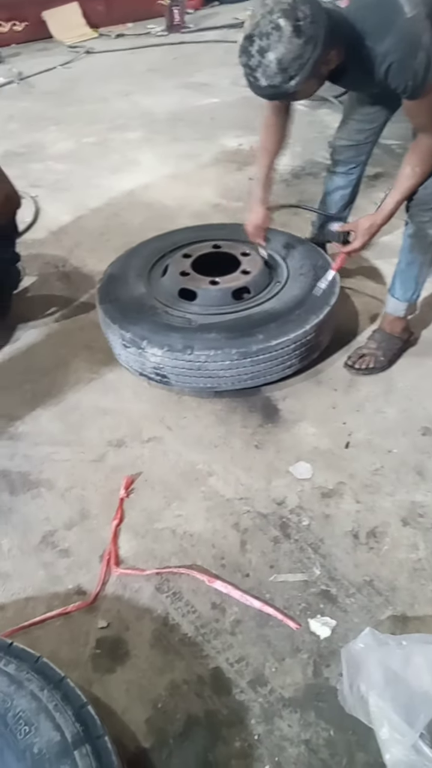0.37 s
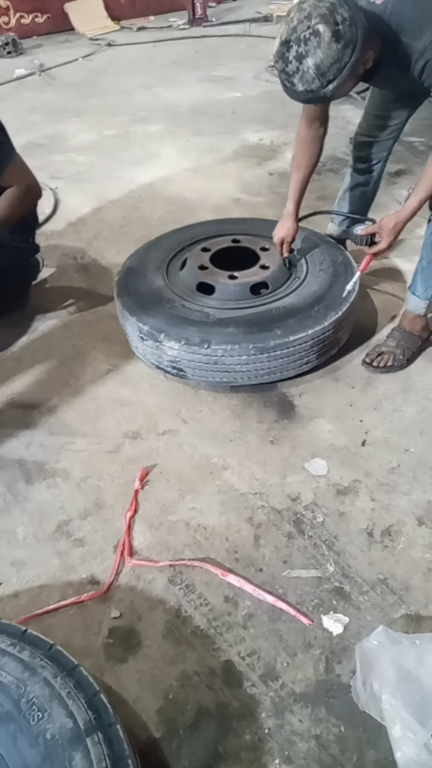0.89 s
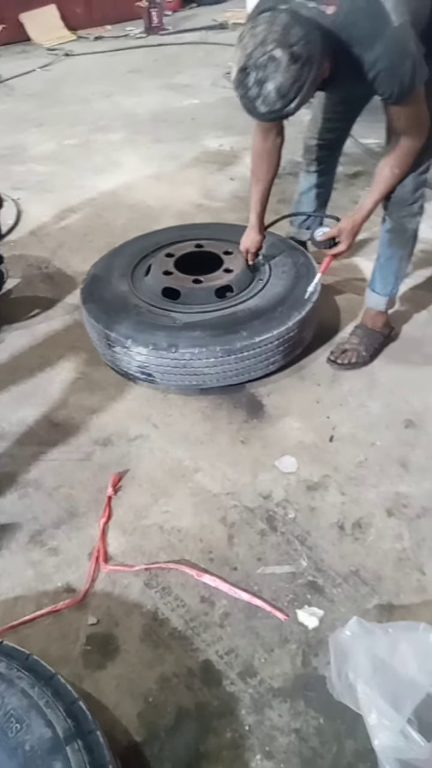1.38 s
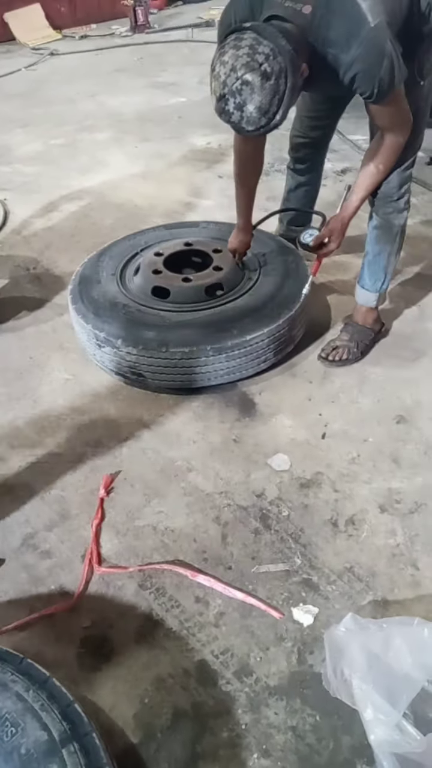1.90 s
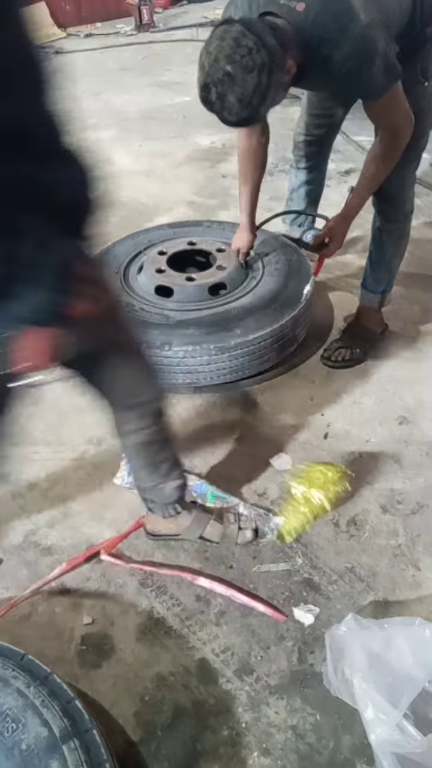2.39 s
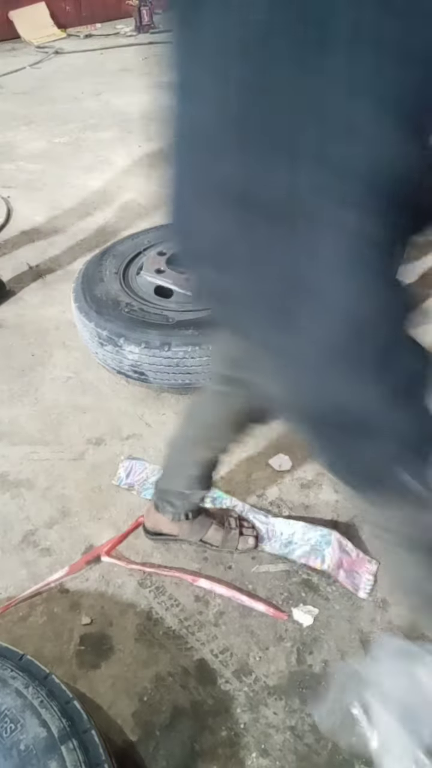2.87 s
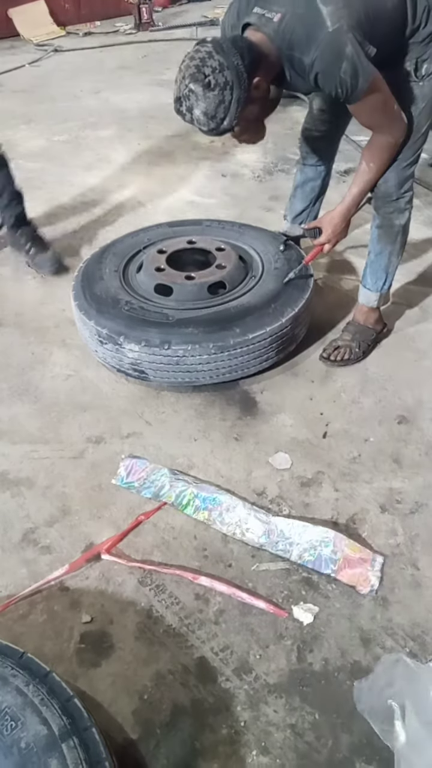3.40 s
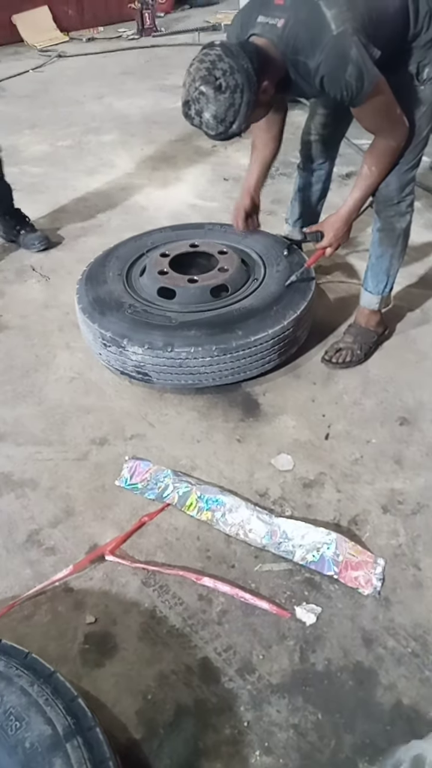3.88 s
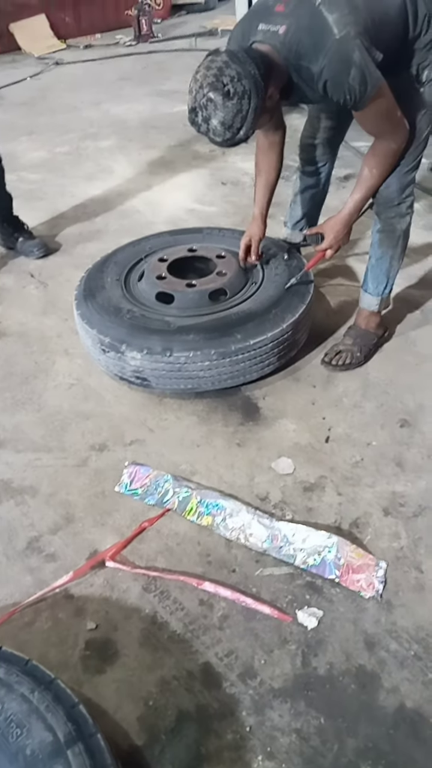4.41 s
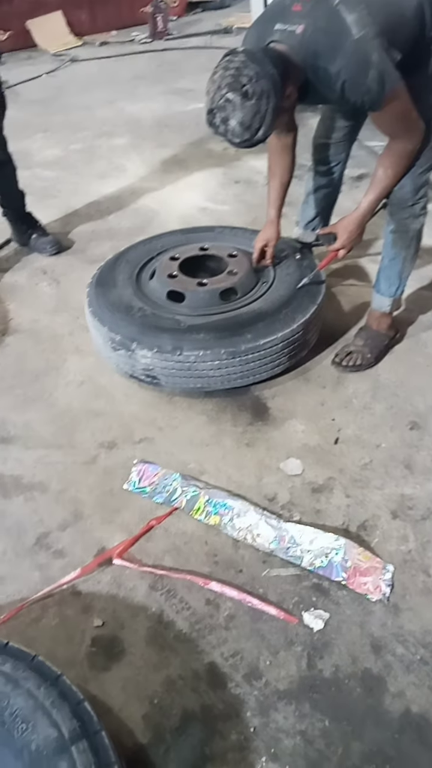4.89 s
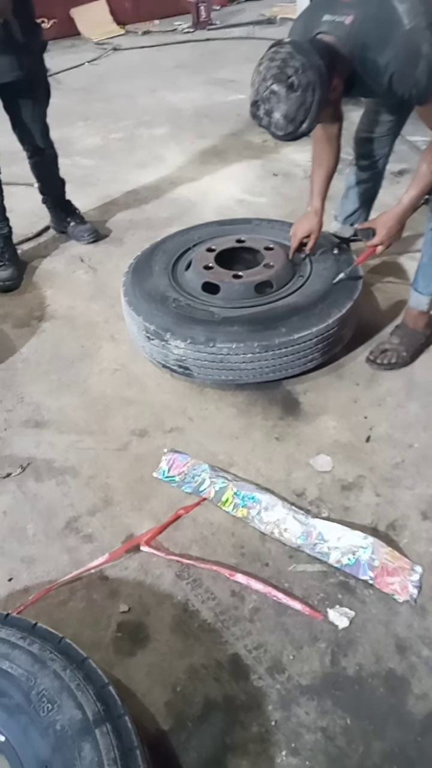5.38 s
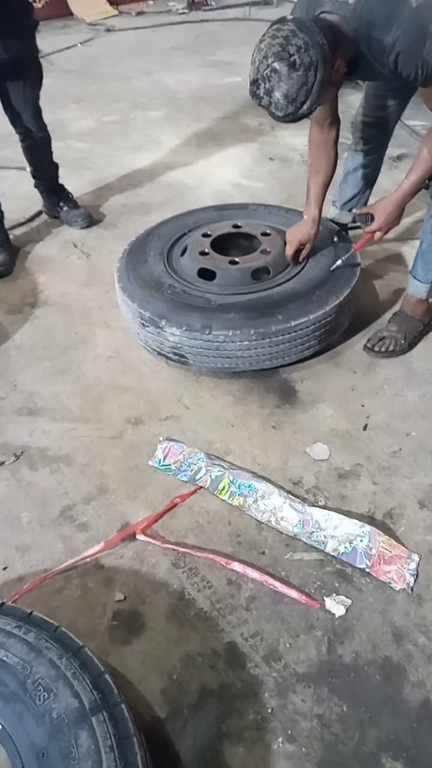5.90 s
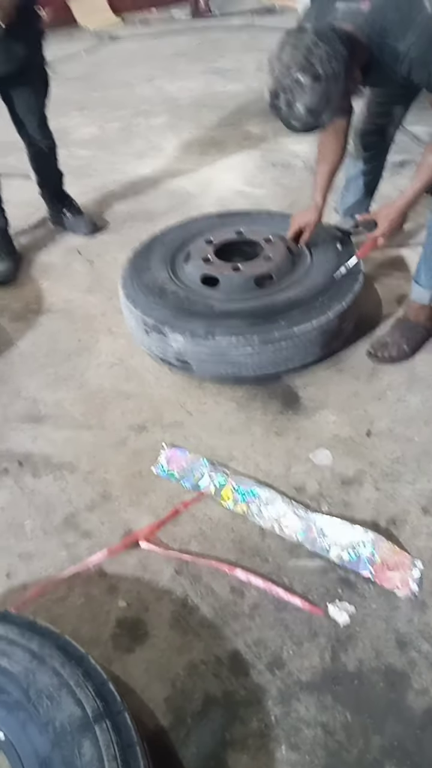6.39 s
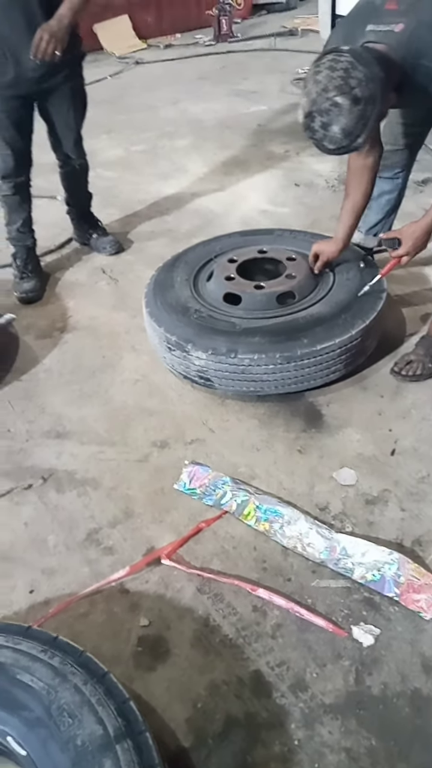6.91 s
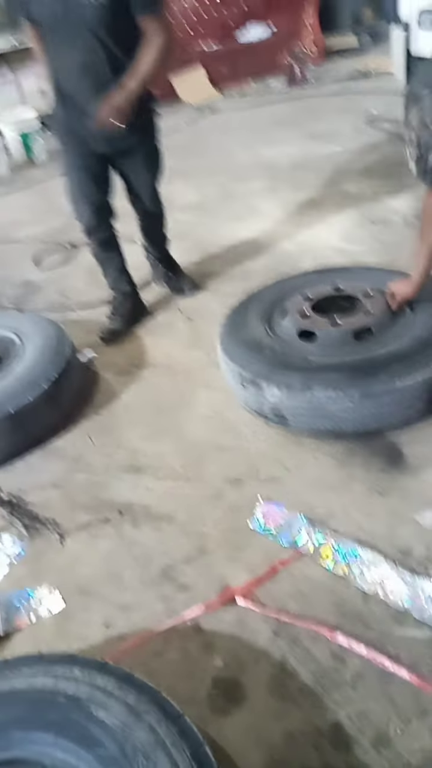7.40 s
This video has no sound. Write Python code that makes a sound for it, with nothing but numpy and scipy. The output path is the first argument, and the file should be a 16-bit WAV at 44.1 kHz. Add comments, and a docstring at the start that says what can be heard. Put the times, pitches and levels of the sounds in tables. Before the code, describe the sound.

A bright, close air hiss from a deflating tyre runs throughout, briefly dulled as someone passes, over low fluttering rumble and a far engine.

```python
"""Air hissing from a tyre valve

A hand-held phone with two microphones stands close to a tyre valve in a concrete yard. The air jet is shaped
noise: it opens with a fading blast, drifts as the hand turns, and loses its direct path while someone shades it.
The yard scatters it in sparse echoes. Two feet thud as damped low swings, a scuff is a short band of noise.
Behind lie a fluttering low noise of machines and traffic, and a far engine of wavering tones with a thin whine."""
import sys
import numpy as np
from scipy import signal
from scipy.io import wavfile
from scipy.ndimage import uniform_filter1d

SR = 44100
rng = np.random.default_rng(int(sys.argv[2]) if len(sys.argv) > 2 else 0)


def attenuation_scalar(level_db):
    """Turn a level in dB into a linear amplitude multiplier (20 dB per decade)."""
    decades = np.asarray(level_db, float) / 20
    return 10 ** decades


def digitize_waveform(pressure):
    """Quantize a signal to 16-bit integers and store it at the path in sys.argv[1].

    Rows of a 2-D input are taken as channels; values are limited to [-1, 1].
    """
    field = np.atleast_2d(pressure).T
    bounded = np.clip(field, -1, 1)
    quanta = np.round(bounded * 32767).astype(np.int16)
    wavfile.write(sys.argv[1], SR, quanta)


N = 332073  # samples
FRAME, HOP = 1024, 256  # short-time spectra, samples
HZ = np.fft.rfftfreq(FRAME, 1 / SR)[:, None]
TIMES = np.arange(N // HOP + 5) * HOP / SR  # frame times, s
LOW_LAG_MS = 0.76  # low sounds come from another side and reach the left port less late than the jet


def evened(x):
    """Scales to rms 1."""
    return x / np.sqrt(np.mean(abs(x) ** 2) + 1e-20)


def read(points):
    """Reads a spectrum table on the frequency bins, straight lines over log frequency."""
    f, value = np.transpose(points)
    return np.interp(np.log(HZ + 1), np.log(f + 1), value)


def follow(rows):
    """Reads the columns of a curve table on the frame times."""
    s, *columns = np.transpose(rows)
    return [np.interp(TIMES, s, c) for c in columns]


def noise_pair(same):
    """Two random short-time spectra, left and right, alike by the share same."""
    a, b, c, d = rng.standard_normal((len(TIMES), len(HZ), 4)).T
    same = np.clip(same, 0, 1)
    right = a + 1j * b
    left = same * right + np.sqrt(1 - same ** 2) * (c + 1j * d)
    return np.array([left, right])


def patches(bins, frames):
    """A random field of blobs over frequency and time, rms 1."""
    field = rng.standard_normal((len(TIMES), len(HZ))).T
    for _ in range(2):
        field = uniform_filter1d(uniform_filter1d(field, bins, 0), frames, 1)
    return evened(field)


def ridges(rows):
    """Bell-shaped bumps and dips in dB; the width is that at half the dB."""
    return sum(db * 2 ** -(2 * (HZ - hz) / width) ** 2 for hz, width, db in rows)


def to_sound(z):
    """Turns short-time spectra back to samples."""
    return signal.istft(z, nperseg=FRAME, noverlap=FRAME - HOP)[1][:, :N]


def unit_power(colour_db):
    """Gains of a colour, scaled so that its noise has rms 1."""
    gain = attenuation_scalar(colour_db)
    return gain / np.sqrt(np.mean(to_sound(noise_pair(0) * gain) ** 2))


def sides(pan_db):
    """Left and right gains with a mean power of 1, left over right by pan_db."""
    pair = attenuation_scalar(np.array([pan_db / 2, -pan_db / 2]))
    return pair / np.sqrt((pair ** 2).mean(0))


def jet():
    """Turbulent noise from the valve; roar and sizzle drift apart from the hiss as nozzle and phone move."""
    # Each row: time in seconds, hiss in dB, roar and sizzle in dB above their usual levels,
    # left-right swing of the sizzle in dB.
    jet_rows = [(0.12, -17, -1, 2, -0.5), (0.3, -16, -4, -.5, 0.5), (1.11, -15, -2.5, 0.5, -0.5),
                (1.45, -16.5, -2.5, 1, -.5), (1.75, -17, 1.5, -1, 1), (2.05, -18.5, 1, 0, 2.5),
                (2.2, -17.5, -1, 0.5, 5), (2.32, -16, -1, 1.5, -1), (2.55, -17, 0.5, 1.5, -0.5),
                (3.8, -17, 1.5, 1, -1.5), (5.1, -17, 1, 0.5, -0.5), (5.8, -15.5, 0, -1, -0.5),
                (7.1, -16, -1, -1.5, 0.5), (7.53, -15, 1, -1.5, -0.5)]
    # A passer-by shades the valve. Each row: time in seconds, strength of the direct path (1 = usual).
    direct_rows = [(0, 1.24), (1.45, 1.05), (1.62, 0.23), (2.12, 0.19), (2.25, 0.91), (4.2, 0.6),
                   (6.0, 1.19), (7.2, 1.2), (7.5, 0.95)]
    # Each row: frequency in Hz, left-right likeness (0-1) at the usual direct path.
    likeness_rows = [(500, 0.7), (1400, 0.87), (1750, 0.4), (2300, 0.75), (5200, 0.52), (6100, 0.33),
                     (8300, 0.59), (12500, 0.57), (15700, .7)]
    flow_db, roar_db, sizzle_db, swing_db = follow(jet_rows)
    strength = follow(direct_rows)[0]
    # the hiss hands over to roar below 3100 Hz and to sizzle above 7300 Hz
    roar = 1 / (1 + (HZ / 3100) ** 6)
    sizzle = 1 / (1 + (7300 / (HZ + 1)) ** 8)

    level_db = flow_db + roar * roar_db + sizzle * sizzle_db
    # the upper lobe of the hiss stands out as the direct path weakens
    level_db += ridges([(7000, 1800, 3.5 * (1 - strength))])
    level_db += roar_db * 0.36 / (1 + (HZ / 800) ** 6)  # the deepest roar swings the most
    hiss_swing = 0.3  # share of the left-right swing that the hiss follows
    turn_db = ((1 - sizzle) * hiss_swing + sizzle) * swing_db

    direct = 1 - (1 - strength) * (1 - 0.5 * roar)  # long waves bend round whatever shades the path
    z = noise_pair(read(likeness_rows) * direct)
    z[0] *= left_path(sizzle)
    # slow shifts of the interference pattern, apart at each port
    drift_db = np.array([0.88 * patches(bins=8, frames=60) for port in z])
    flutter_db = jet_flutter(sizzle)
    swing_pair_db = np.array([turn_db / 2, -turn_db / 2])
    z *= unit_power(port_colours()) * attenuation_scalar(level_db + drift_db + flutter_db + swing_pair_db)
    return to_sound(z)


def jet_flutter(sizzle):
    """The jet is unsteady: quick patches of level in dB, and its deepest roar comes in lumps."""
    flutter_db = 0.46 * patches(bins=150, frames=4) + 0.37 * sizzle * patches(bins=60, frames=2)
    return flutter_db + 2.2 * patches(bins=4, frames=8) / (1 + (HZ / 750) ** 6)


def port_colours():
    """The jet through each microphone port: close reflections off rim, tyre and floor leave ridges and notches."""
    # Each row: frequency in Hz, density in relative dB per Hz.
    left_tint, right_tint = [(500, -19), (740, -22), (830, -17), (1500, -13.0), (3600, -17), (3900, -10.5),
                             (4500, -2), (6700, -7.0), (7900, -14), (8600, -13), (11000, -14.5),
                             (13850, -17.5), (14500, -8.5), (15700, -8.5)], [(500, -29), (740, -29.9), (830, -22.5), (1500, -16.5),
                                                  (3000, -20), (4900, -18), (5400, -7.5), (6800, -15.5),
                                                  (7900, -16.5), (9800, -11), (11500, -15.5),
                                                  (13850, -24.5), (14500, 0), (15700, -13.5)]
    # Ridges and notches. Each row: centre in Hz, width in Hz, height in dB.
    left_bumps, right_bumps = [(1096, 81, -4.5), (1250, 61, -6), (1510, 106, -2.5), (2076, 59, -4.5),
                               (2210, 300, 4), (2680, 355, 7), (3279, 160, 1.5), (3430, 706, 8),
                               (3840, 99, 2), (4107, 555, 5.0), (5640, 94, -12), (5850, 210, 3),
                               (6490, 370, 3), (7929, 200, 0), (10670, 400, 4.5), (11020, 120, -10)], [(1064, 140, -12.5), (1240, 73, -5), (1411, 84, -7),
                                                    (1760, 74, 9), (1727, 240, -16.5), (2150, 170, 0),
                                                    (2254, 400, -1), (3330, 180, 5), (3380, 557, 1.3),
                                                    (4350, 150, 6.5), (4550, 101, 1.5), (5355, 99, 1),
                                                    (6550, 480, 5.5), (7460, 142, 6), (11520, 250, 3.5),
                                                    (14480, 560, -11.5)]
    left_db = read(left_tint) + ridges(left_bumps)
    right_db = read(right_tint) + ridges(right_bumps)
    # the jet is too small to radiate bass
    return np.array([left_db, right_db]) - 40 * np.log10(1 + (400 / (HZ + 1)) ** 4)


def left_lag():
    """Phase turn that delays the left port as the phone is held."""
    # How the phone is turned. Each row: time in seconds, lag of left behind right in ms.
    lag_rows = [(.7, 1.077), (1.0, 1.054), (1.5, 1.036), (3.1, 1.032), (4.3, 1.019), (4.6, 1.025),
                (5.1, 1.057), (6.0, 1.068), (6.7, 1.061), (6.95, 1.052), (7.5, 1.044)]
    return np.exp(-2j * np.pi * HZ * follow(lag_rows)[0] / 1000)


def left_path(sizzle):
    """Sound bends round the phone to the left port; an inverted echo off the hand combs its treble."""
    # The treble bends round latest. Each row: frequency in Hz, extra lag in radians.
    bend_rows = [(300, -.3), (700, -.7), (1200, .3), (2400, -.4), (2900, .3), (3600, -.7), (4800, 1.2),
                 (7000, 2.1), (9000, 6.1), (10500, 6.3), (12700, 10.6), (15700, 13.4)]
    # The phone tips towards the end. Each row: time in seconds, strength of the hand's echo (0-1).
    hand_rows = [(6.75, 0), (7.0, .5), (7.2, .55), (7.4, .35), (7.53, .3)]
    hand_ms = 0.197
    hand_echo = sizzle * follow(hand_rows)[0] * np.exp(-2j * np.pi * HZ * hand_ms / 1000)
    return left_lag() * np.exp(-1j * read(bend_rows)) * (1 - hand_echo)


def puffs():
    """The fuller opening blast dies away; puffs of air and a scuff are noise bands that rise fast and decay."""
    # The blast. Each row: frequency in Hz, density in relative dB per Hz.
    blast_tint = [(240, -52), (400, -22), (554, -26), (798, -4.5), (1380, -17), (1530, -3), (1770, -14),
                  (2790, -7), (3430, -9.5), (3960, -0.5), (9000, -18), (11700, -45), (19800, -120)]
    # Its fading. Each row: frequency in Hz, time to fall 60 dB in seconds.
    blast_fade = [(500, 0.28), (800, 0.45), (1500, 0.48), (2600, 0.61), (4600, 0.4)]
    # Short puffs and a scuff. Each row: start in seconds, level in dB, centre in Hz,
    # octaves from the centre to -6 dB, left over right in dB.
    puff_rows = [(.125, -23, 4670, .08, 12), (.13, -25, 12500, .15, 2), (2.57, -28.5, 1570, .21, 11)]
    blast_db, blast_pan_db = -14.5, 8.5
    rise_s, t60 = 0.017, 0.26  # of each puff, s
    fade = attenuation_scalar(blast_db - 60 * TIMES / read(blast_fade))
    z = sides(blast_pan_db)[:, None, None] * unit_power(read(blast_tint)) * fade
    for s, db, hz, octaves, pan_db in puff_rows:
        band = unit_power(-6.0 * (np.log2((HZ + 1) / hz) / octaves) ** 2)
        rise = np.clip((TIMES - s) / rise_s, 0, 1)
        fall = attenuation_scalar(db - 60 * np.maximum(TIMES - s - rise_s, 0) / t60)
        z = z + sides(pan_db)[:, None, None] * band * rise * fall
    z = z * noise_pair(0.66 + 0 * HZ)
    z[0] *= left_lag()
    return to_sound(z)


def yard(x):
    """Scattered reflections off floor, tyres and walls: sparse taps of random sign beside the direct sound."""
    yard_db, t60 = -10, 0.12  # echoes against direct sound in dB, decay in s
    t, out = np.arange(SR // 8) / SR, x.copy()
    for k in range(3):  # three sets take turns as the hand drifts
        signs = rng.choice([-1., 1.], (2, len(t)))
        hits = rng.random((2, len(t))) < 1500 / SR  # 1500 a second on average
        taps = signs * hits * (t > 0.002)
        taps = attenuation_scalar(yard_db) * evened(taps * attenuation_scalar(-60 * t / t60)) / np.sqrt(len(t))
        turn = np.sqrt(2 / 3) * np.cos(np.pi * (np.arange(N) / SR / 5.0 + k / 3))
        out += signal.oaconvolve(x * turn, taps, axes=1)[:, :N]
    return out / np.sqrt(1 + attenuation_scalar(2 * yard_db))


def both_ports(x, pan_db):
    """A low sound at the two ports, the left a little late."""
    return sides(pan_db)[:, None] * np.array([np.roll(x, round(LOW_LAG_MS / 1000 * SR)), x])


def thuds():
    """Soles meet the concrete: one damped low swing each."""
    # Each row: start in seconds, peak in dB before panning, pitch in Hz, time to fall 60 dB in seconds.
    thud_rows = [(2.272, -27, 212, 0.042), (5.154, -37, 223, 0.07)]
    out, t = np.zeros(N), np.arange(SR // 4) / SR
    for s, db, hz, t60 in thud_rows:
        onset = 1 - np.exp(-(t / 0.008) ** 2)
        swing = np.sin(2 * np.pi * hz * t) * onset * attenuation_scalar(-60 * t / t60)
        out[round(s * SR):][:len(t)] += attenuation_scalar(db) * swing / abs(swing).max()
    return both_ports(out, 4.1)


def flutter():
    """The low sounds flutter in puffs and lulls: quick random changes of level in dB, one value a frame."""
    chance = rng.standard_normal(len(TIMES))
    for _ in range(2):
        chance = uniform_filter1d(chance, 4)
    return 3.2 * np.clip(evened(chance), -2.5, 0.7)  # lulls go deeper than puffs rise


def rumble_level():
    """Level of the yard rumble in dB: a slow course, random flutter and brief deep lulls."""
    # The course about which it flutters. Each row: time in seconds, level in dB.
    course_rows = [(0.0, -46), (0.36, -62.5), (0.63, -54), (.96, -54), (1.05, -58), (1.4, -52),
                   (1.75, -42.5), (2.3, -48.5), (3.4, -48), (3.7, -45.5), (4.0, -48), (4.3, -41),
                   (4.75, -51), (5.3, -45), (5.8, -47.5), (6.5, -49), (7.53, -48)]
    # The deepest brief lulls. Each row: time in seconds, depth in dB.
    lull_rows = [(.71, -13), (.88, -11), (2.73, -10), (4.01, -11), (4.2, -13), (4.74, -11), (6.0, -9),
                 (6.77, -11)]
    lull_s = 0.025
    lulls_db = sum(db * np.exp(-((TIMES - s) / lull_s) ** 2) for s, db in lull_rows)
    return follow(course_rows)[0] + flutter() + lulls_db


def rumble(level_db):
    """Lumpy low noise of distant machines and traffic, nearly alike at both ports."""
    # Each row: frequency in Hz, density in relative dB per Hz.
    rumble_tint = [(25, -32), (50, -13), (90, -8.5), (150, -2.5), (220, 3.5), (320, -1.5), (440, -7),
                   (700, -12), (900, -36), (1500, -120)]
    z = noise_pair(0.83 + 0 * HZ) * unit_power(read(rumble_tint))
    z *= attenuation_scalar(level_db + 2.0 * patches(bins=3, frames=6))
    z[0] *= np.exp(-2j * np.pi * HZ * LOW_LAG_MS / 1000)
    return sides(5.5)[:, None] * to_sound(z)


def fuzzy_tone(hz, width):
    """A tone whose height and phase wander as slow noise; a larger width in Hz wanders faster."""
    r = np.exp(-np.pi * width / SR)
    wander = rng.standard_normal(N) + 1j * rng.standard_normal(N)
    for _ in range(2):
        wander = signal.lfilter([1 - r], [1, -r], wander)
    carrier = np.exp(2j * np.pi * np.cumsum(hz * np.ones(N)) / SR)
    return evened((wander * carrier).real)


def hum(t):
    """The engine's lowest tone: a sine that breaks up into a wavering, fluttering fuzzy tone."""
    # Each row: time in seconds, pitch in Hz before wavering, level in dB before fluttering.
    hum_rows = [(1.45, 65, -70), (1.53, 65.5, -54.5), (2.3, 67, -57.5), (2.85, 72.5, -62),
                (4.1, 77.5, -56.5), (5.2, 79, -55.5), (5.9, 79, -60), (7.0, 72, -56), (7.53, 73, -62)]
    # Each row: time in seconds, share of the hum that is broken and wavering (0-1).
    broken_rows = [(2.25, .3), (2.5, .9), (7.5, .93)]
    s, hz, db = np.transpose(hum_rows)
    broken = np.interp(t, *np.transpose(broken_rows))
    waver_hz = 4 * evened(uniform_filter1d(rng.standard_normal(N), SR // 10))
    hz = np.interp(t, s, hz) + broken * waver_hz
    steady = np.sqrt(2) * np.sin(2 * np.pi * np.cumsum(hz) / SR)
    tone = np.sqrt(1 - broken ** 2) * steady + broken * fuzzy_tone(hz, 28)
    level_db = np.interp(t, s, db, left=-99) + broken * np.interp(t, TIMES, flutter())
    return attenuation_scalar(level_db) * tone


def drones(t, rumble_db):
    """Fuzzy tones that swell with the rumble."""
    # Each row: pitch in Hz, nominal width in Hz, level in dB over the rumble's.
    drone_rows = [(119, 15, -12.5), (151, 20, -11.5), (221, 21, -9)]
    tones = sum(attenuation_scalar(db) * fuzzy_tone(hz, width) for hz, width, db in drone_rows)
    return attenuation_scalar(np.interp(t, TIMES, rumble_db)) * tones


def whine(t):
    """A thin passing tone, nearly steady in pitch."""
    # Each row: time in seconds, level in dB.
    whine_rows = [(3.85, -90), (3.95, -57), (4.15, -58), (4.3, -72), (4.5, -56), (4.75, -56), (4.85, -90)]
    return attenuation_scalar(np.interp(t, *np.transpose(whine_rows))) * fuzzy_tone(388, 1.5)


def engine(rumble_db):
    """A far engine: the hum, the drones and the whine arrive together from one side."""
    t = np.arange(N) / SR
    return both_ports(hum(t) + drones(t, rumble_db) + whine(t), 1.9)


def scene():
    """All sources at the two ports; only the air and the scuff ring in the yard."""
    rumble_db = rumble_level()
    return yard(jet() + puffs()) + rumble(rumble_db) + engine(rumble_db) + thuds()


def band_limit(x):
    """A steep low-pass at the top of the band."""
    return signal.sosfilt(signal.butter(12, 17100, fs=SR, output="sos"), x)


def record(dry):
    """The phone rounds off the loudest peaks and cuts the treble at 15760 Hz."""
    rounded = dry / (1 + dry ** 6) ** (1 / 6)
    edge = signal.firwin(511, 15760, window=("kaiser", 9), fs=SR)
    mix = signal.oaconvolve(rounded, edge[None], "same")
    return band_limit(mix)


dry = scene()
out = record(dry)
digitize_waveform(out)
```